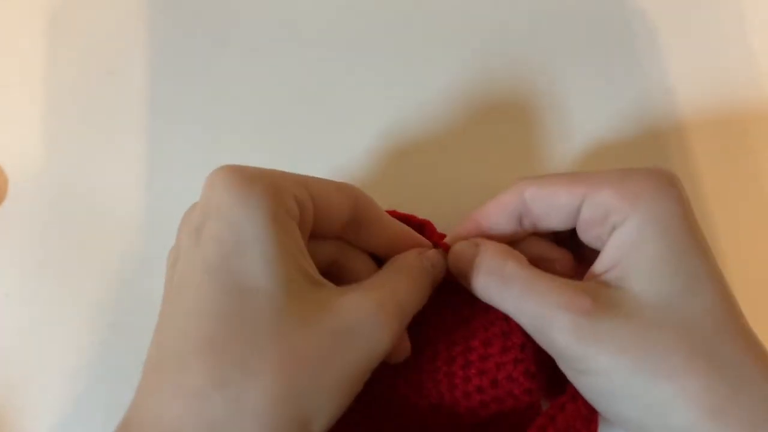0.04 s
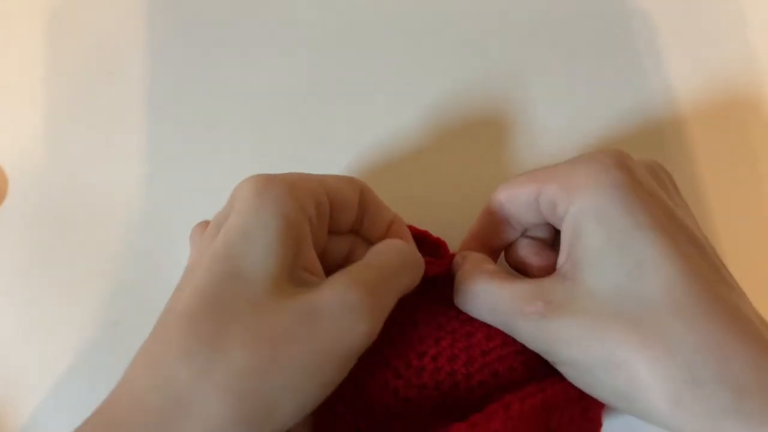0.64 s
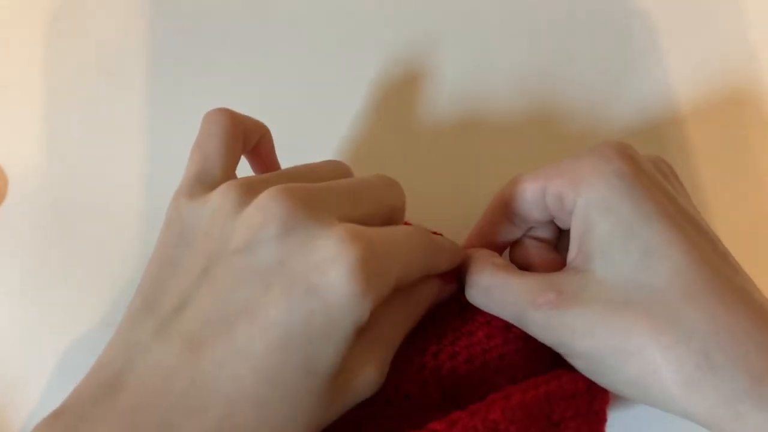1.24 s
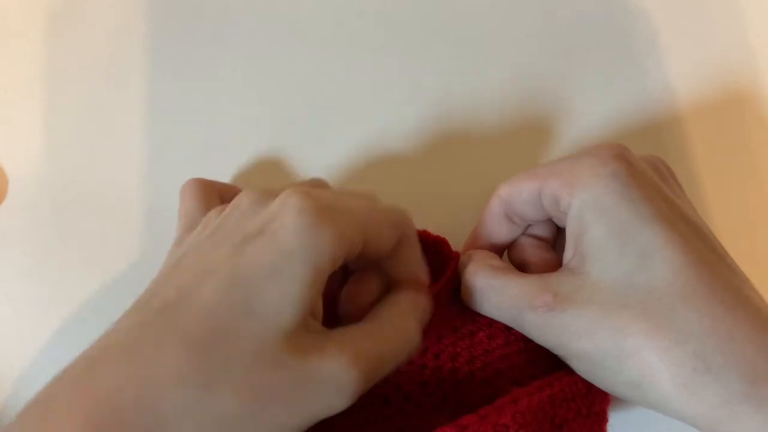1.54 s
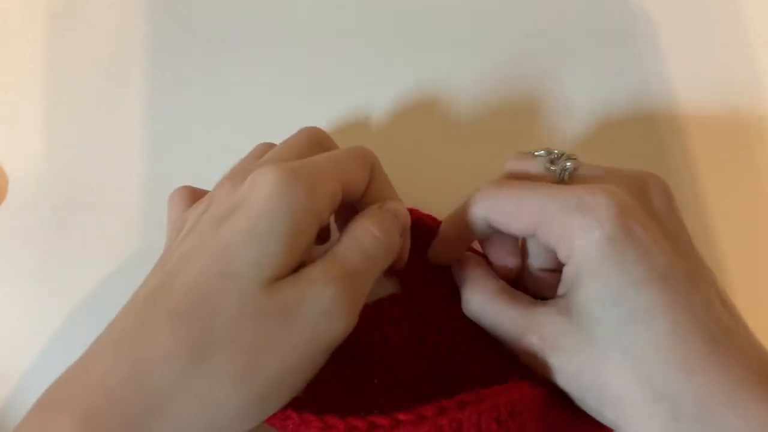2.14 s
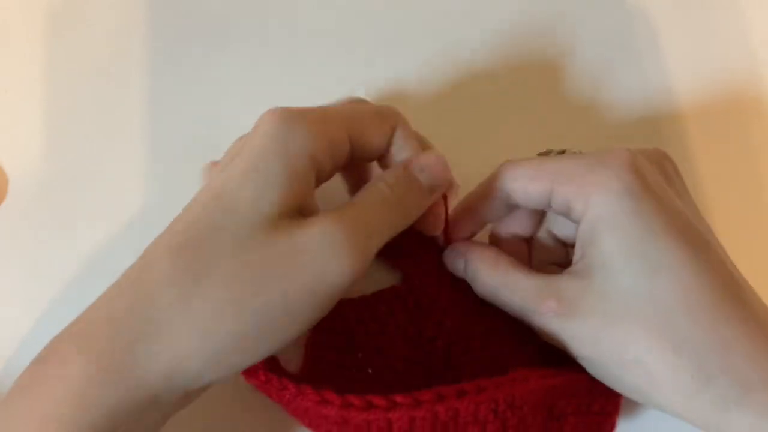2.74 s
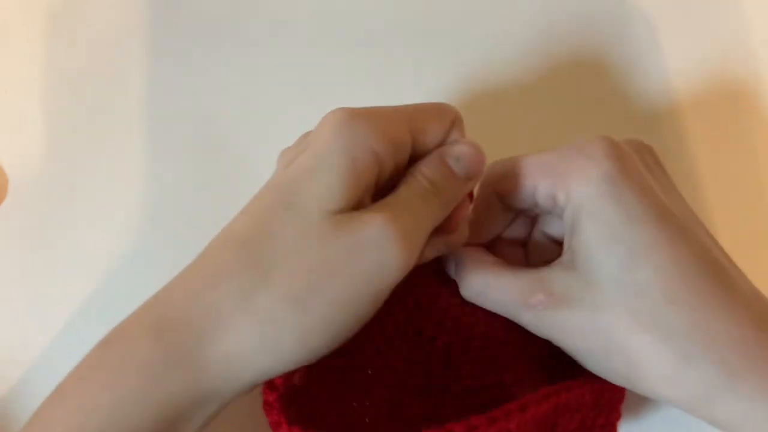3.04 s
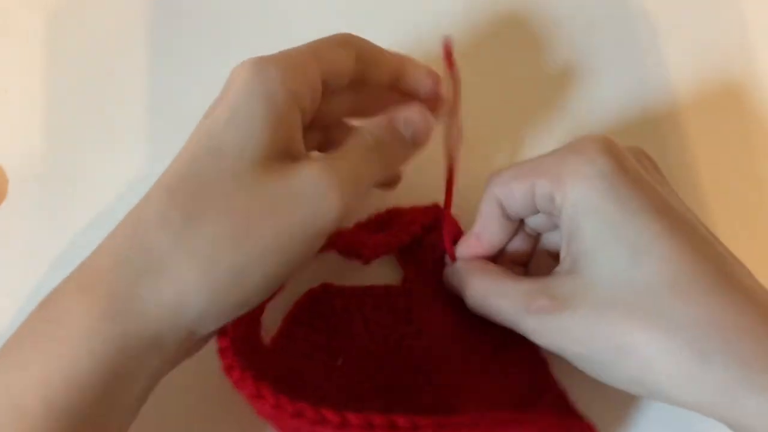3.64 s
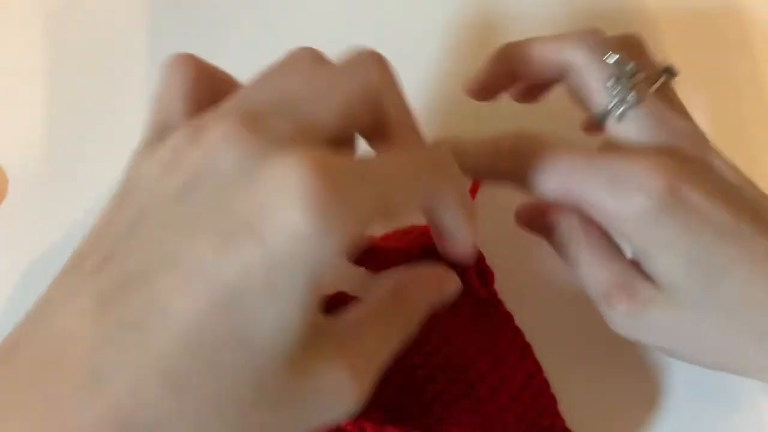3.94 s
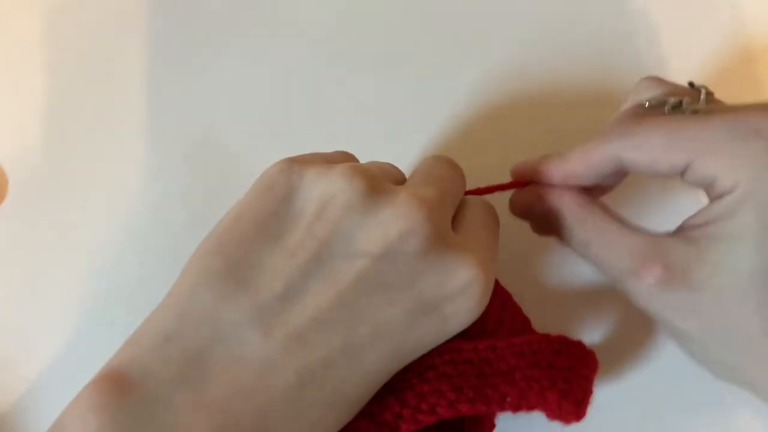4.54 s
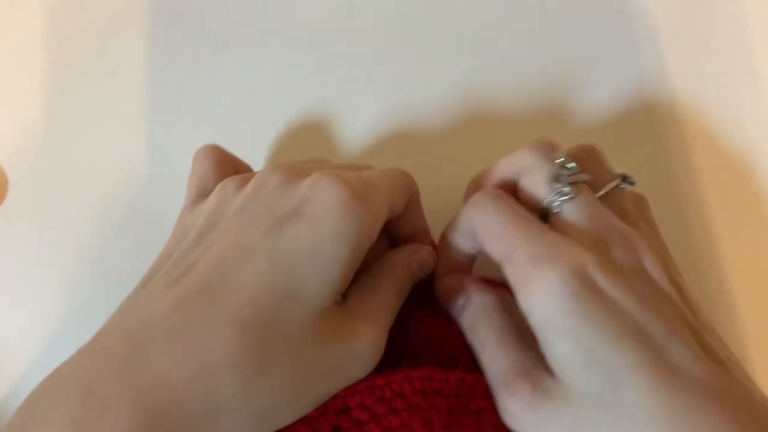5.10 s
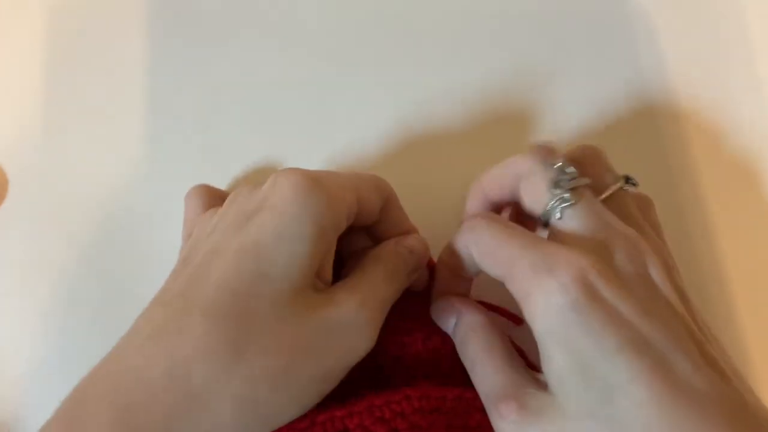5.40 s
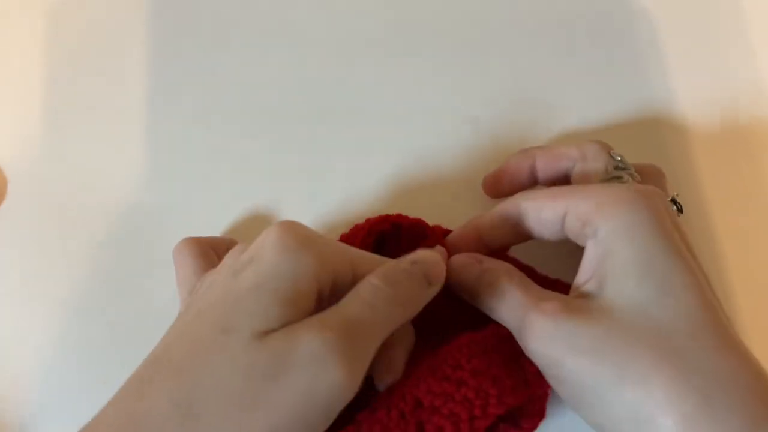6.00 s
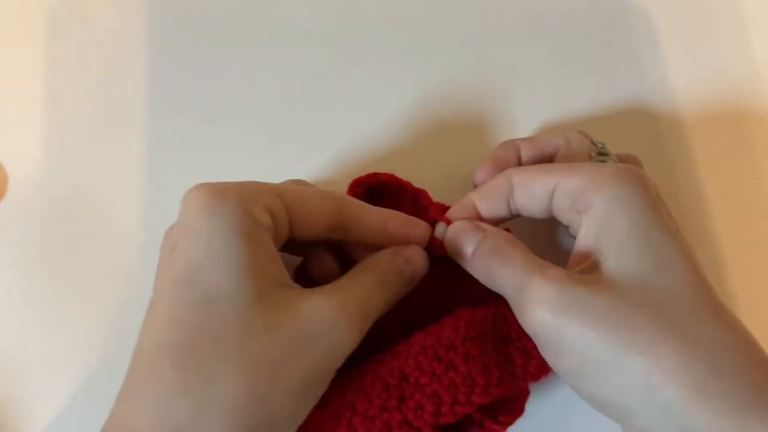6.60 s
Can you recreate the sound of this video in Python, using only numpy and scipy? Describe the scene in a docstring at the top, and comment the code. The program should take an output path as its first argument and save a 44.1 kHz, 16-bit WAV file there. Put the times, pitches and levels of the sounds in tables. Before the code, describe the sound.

Close, quiet rustling and hissing of yarn being tied, with fingers knocking on a table, light ticks and a few faint distant clicks.

```python
"""Tying off crochet yarn

Two hands finish a crocheted piece on a table, close by in a quiet room. Wool slides over skin and
stitches in soft rubs and three long pulls, a hiss of fibres slipping free. Fingers brush, bump and
knock on the table top, and nails tick. Further off a small hard thing, perhaps a plastic button,
clicks now and then over a low room rumble."""
import sys
import numpy as np
from scipy import signal
from scipy.fft import rfft, irfft, next_fast_len
from scipy.io import wavfile

SR = 44100
rng = np.random.default_rng(int(sys.argv[2]) if len(sys.argv) > 2 else 0)


def master_out(mix):
    """Clip the mix to full scale and print it as 16-bit PCM to the path in sys.argv[1]."""
    frames = np.transpose(np.atleast_2d(mix))
    ceiling = np.clip(frames, -1, 1)
    pcm = np.round(ceiling * 32767).astype(np.int16)
    wavfile.write(sys.argv[1], SR, pcm)


N = 302526
T = np.arange(N) / SR
SIZE = next_fast_len(N, True)
FREQ = np.maximum(np.arange(SIZE // 2 + 1) * SR / SIZE, 1)

# colour of the room tone: freq_hz, gain_db
ROOM_COLOUR = [(22, -39), (32, -31), (42, -9.5), (55, -14), (72, -0.5), (88, -1), (120, -9), (160, -29),
               (300, -39), (600, -54), (1600, -54.5), (3000, -69), (5500, -67.5), (16000, -69)]
# distant clicks: snap_s, level_db
CLICKS = [(-.012, -48.5), (0.2765, -47.5), (0.5405, -49.5), (0.599, -51.5), (0.8366, -47), (0.9362, -51),
          (1.958, -48)]
# resonances of the small hard thing: pitch_hz, width_hz, gain_db
CLICK_MODES = [(283, 330, 13.5), (1040, 350, 6), (1695, 310, 7), (2290, 83, 6.5), (3580, 130, 0),
               (4510, 540, 5), (5950, 1340, 2), (7720, 65, 8.5), (8730, 230, 6.5), (9500, 86, -6),
               (10250, 340, 4.5), (10840, 310, 7), (11000, 68, 9), (14200, 190, -10), (15350, 150, 1)]
# resonances of the table top: pitch_hz, t60_s, gain_db
TABLE_MODES = [(155, 0.062, -11), (235, 0.082, -1), (292.6, 0.041, 1.5), (358, 0.097, -1), (448, 0.05, -4),
               (540, 0.033, 0.5), (721, 0.022, -5), (1215, 0.018, 1.5), (1583, 0.03, -10)]
# the heel of a hand dragging: middle_s, level_db, half_length_s
DRAGS = [(.005, -65, 0.014), (1.58, -66.5, 0.036), (1.705, -62, 0.0069), (1.80, -62, 0.041),
         (4.135, -58.5, 0.033), (6.005, -59, 0.024), (6.355, -56.5, 0.022), (6.455, -52.5, 0.034)]
# fingers scuffing the table: middle_s, level_db, half_length_s
SCUFFS = [(3.199, -54.5, 0.0066), (6.019, -58, 0.0059), (6.036, -57, 0.017), (6.057, -54.5, 0.014),
          (6.383, -48, 0.018), (6.4025, -45.5, 0.0045)]
# colour of a scuff: freq_hz, gain_db
SCUFF_COLOUR = [(150, 12), (400, -3.5), (750, -5.5), (1100, -6.5), (1450, 8.5), (1850, -8), (2700, -23.5),
                (4300, -17), (9000, -29.5), (15000, -35)]
# hands bumping the table: start_s, level_db
BUMPS = [(0.139, -41), (.968, -41), (1.193, -40), (0.297, -40.5), (3.135, -37.5), (3.202, -26),
         (3.54, -41.5), (4.098, -27.5), (5.575, -44.5), (5.829, -42), (6.0044, -34.5), (6.354, -35.5),
         (6.4217, -32.5), (6.482, -34), (6.7778, -32.5)]
# finger knocks: start_s, level_db, contact_ms
KNOCKS = [(3.181, -49.5, 1.3), (3.199, -38, 7.5), (4.0813, -34.5, 1.5), (4.094, -38.5, 5.5),
          (6.062, -47.5, 0.68), (6.38, -37.5, 0.91), (6.394, -35, 0.7), (6.4000, -35, 0.14),
          (6.4064, -40, 0.77), (6.768, -54.5, 6.2)]
# ticks of nails and finger rings: start_s, level_db, pitch_hz, tail_db (relative to the crack)
TICKS = [(1.386, -61, 7800, -9), (1.6901, -46.5, 4530, -10), (1.7371, -50.5, 4630, 4),
         (1.8621, -53, 5750, -11), (1.987, -47.5, 1290, -10), (3.1870, -50, 4170, 8),
         (4.0835, -52, 5870, -6), (5.31, -31.5, 5500, -16), (6.3423, -56, 1090, -15),
         (6.4007, -44, 1240, -20), (6.6980, -53, 3430, -8)]
# colour of wool sliding over skin: freq_hz, gain_db
WOOL_COLOUR = [(120, 3), (300, 0.5), (440, -8), (560, -8), (720, -9.5), (1000, -6.5), (1500, 3.5),
               (2050, -3), (2850, -15.5), (4200, -6), (6000, -6.5), (7400, -11), (10800, -13.5),
               (15500, -26.5)]
# short rubs on the wool: peak_s, length_s, hiss_db, body_db, fibre_db (last two relative to the hiss)
RUBS = [(0.047, 0.14, -74, 6, -20), (0.25, 0.13, -82, 13.5, -20), (0.335, 0.17, -71.5, 1.5, -7),
        (0.465, 0.066, -73, 3.5, -18), (0.673, 0.25, -67.5, -3.5, -6.5), (1.048, 0.21, -76.5, 2.5, -21),
        (1.332, 0.034, -87.5, 12, -10), (1.42, 0.11, -77.5, -4, -10), (1.553, .11, -70.5, 1.5, -8),
        (1.628, 0.021, -67, -3, -15), (1.773, 0.25, -70.5, 0.5, -11), (2.12, .2, -88, -4, -20),
        (3.196, 0.11, -70, 5, -8.5), (3.357, 0.058, -89, 15.5, -5), (4.044, 0.051, -67.5, 6, -9.5),
        (4.122, 0.066, -63.5, 3.5, -4), (4.227, 0.17, -81.5, 4.5, -18), (4.328, .12, -68.5, 3, -12),
        (4.42, 0.034, -71.5, 4.5, -11.5), (4.548, 0.17, -69, 3.5, -11.5), (4.687, 0.066, -69.5, 5, -8),
        (4.785, 0.11, -69.5, 3.5, -10.5), (4.943, 0.2, -67, 1, -6.5), (5.101, 0.14, -67, 1, -12.5),
        (5.296, 0.15, -66.5, 4, -9.5), (6.062, 0.17, -70, 3.5, -12), (6.174, 0.085, -70.5, 0, -14),
        (6.281, 0.11, -70.5, 2, -5.5), (6.393, 0.072, -69, 6.5, -5.5), (6.568, 0.18, -66.5, -1.5, -12.5),
        (6.753, 0.27, -78, 5.5, -19)]
# long pulls through the knot, a curve each: time_s, hiss_db, body_db, fibre_db (relative as in RUBS)
PULLS = [
    [(2.44, -88, -6, -9), (2.506, -79, -2.5, -19), (2.614, -70, 4.5, -6.5), (2.674, -68.5, 4, -6),
     (2.744, -65, -4.5, -6), (2.942, -76, 0.5, -9.5), (3.068, -71.5, -5, -11), (3.11, -81.5, 4.5, -16)],
    [(3.48, -89, -8, -2), (3.494, -83, -13, -12), (3.518, -69, -0.5, -10), (3.634, -61, -2, -1),
     (3.798, -67.5, 2.5, -6), (3.886, -69.5, -2.5, -10), (3.94, -86, 6, -13), (3.95, -97, -3, -13)],
    [(5.34, -68, 1.5, -0.5), (5.418, -66, 0, -8), (5.51, -65.5, -1, -4.5), (5.564, -62.5, 2.5, -4),
     (5.848, -62.5, -1, -6.5), (5.954, -73.5, 5.5, -10), (5.98, -79, -5, -15)],
]
# phase by which left leads right: freq_hz, tan_half_phase
STEREO_PHASE = [(250, 0), (450, .35), (700, 1.0), (1380, .55), (1950, .15), (2250, -1.0), (2650, -2.0),
                (3050, 1.9), (3500, 1.0), (4300, .05), (8000, 0)]
# scattered sound that widens the image: freq_hz, side_gain_db
STEREO_WIDTH = [(60, -30), (110, -26), (200, -14), (380, -10), (700, -4), (1300, -9), (2600, -2),
                (4400, -11), (8000, -15), (15000, -14)]
# lean of the image: freq_hz, left_minus_right_db
STEREO_LEAN = [(80, -.2), (180, -2), (350, -5), (700, -1), (1300, 0), (2400, -2.5), (4500, -1.8),
               (10000, 0)]


def undb(db):
    """Decibels to gain."""
    return 10 ** (np.asarray(db) / 20)


def rms(x):
    """Root mean square."""
    return np.sqrt(np.mean(x ** 2))


def eq_curve(points):
    """Gain at every frequency from (freq_hz, gain_db) points."""
    hz, db = np.transpose(points)
    return undb(np.interp(np.log(FREQ), np.log(hz), db))


def shape(x, gain):
    """Filter by a gain per frequency."""
    return irfft(rfft(x, SIZE) * gain, SIZE)[..., :N]


def noise(colour):
    """Mid and side noise in one colour, with an rms of 1."""
    x = shape(rng.standard_normal((2, N)), colour)
    return x / rms(x)


def resonance(hz, width_hz):
    """Complex response of one damped resonance."""
    return 1 / (1 + 1j * (FREQ ** 2 - hz ** 2) / (FREQ * width_hz))


def decay(start_s, t60):
    """Envelope that jumps to 1 and dies away exponentially."""
    return (T >= start_s) * undb(-60 * np.clip((T - start_s) / t60, 0, 4))


def wander(rate_hz):
    """Smooth random drift with a spread of about 1."""
    count = int(3 * rate_hz * T[-1]) + 3
    points = np.convolve(rng.standard_normal(4096), np.hanning(5), "same")[:count]
    return np.interp(T, np.linspace(0, T[-1], len(points)), points / rms(points))


def room_tone(rumble_db=-52.5, drift_db=0.47, hiss_db=-49.5, crossover_hz=170):
    """The bed: a slowly swelling low rumble under a faint steady hiss."""
    air = noise(eq_curve(ROOM_COLOUR))
    rumble = shape(air, 1 / (1 + (FREQ / crossover_hz) ** 8))
    return rumble * undb(rumble_db + drift_db * wander(0.73)) + (air - rumble) * undb(hiss_db)


def distant_clicks(snap_db=-2, tail_db=-10, tail_t60=0.38, treble_t60=0.3, crossover_hz=4500):
    """A soft first contact, then a bright snap; the room rings after both, more briefly in the treble."""
    lead_s, lead_db = .0132, -11  # the first contact
    rise_s, snap_t60 = .002, .045
    mode_power = sum(abs(undb(db) * resonance(hz, width) ** 1.68) ** 2 for hz, width, db in CLICK_MODES)
    sheen = undb(-8) * resonance(10400, width_hz=12000)
    colour = np.sqrt(mode_power + abs(sheen) ** 2)
    highpass = FREQ ** 2 / (FREQ ** 2 + crossover_hz ** 2)
    envelope = sum(undb(db) * ((T < s) * np.exp(-abs(T - s) / rise_s) + decay(s, snap_t60))
                   for s, db in CLICKS)

    def tail(t60):
        """Envelope of the room's answer to all clicks."""
        return sum(undb(db) * np.hypot(undb(lead_db) * decay(s - lead_s, t60),
                                       undb(tail_db) * decay(s, t60)) for s, db in CLICKS)

    ring = noise(colour)
    treble = shape(ring, 1 - 1 / (1 + (FREQ / crossover_hz) ** 4))
    snaps = undb(snap_db) * envelope * noise(colour * highpass)
    return snaps + tail(treble_t60) * treble + tail(tail_t60) * (ring - treble)


def skin_friction(touches, colour, stutter_db, stutter_hz):
    """Skin stutters across the table top, one brief swell of noise per touch."""
    pressure = sum(undb(db) * np.exp(-.5 * ((T - s) / half_s) ** 2) for s, db, half_s in touches)
    return pressure * undb(stutter_db * wander(stutter_hz)) * noise(colour)


def hand_drags(lowpass_hz=125):
    """The heel of a hand drags dully and stirs the table's low modes."""
    table = sum(undb(db) * resonance(hz, np.log(1000) / np.pi / t60) for hz, t60, db in TABLE_MODES)
    return skin_friction(DRAGS, table / (1 + (FREQ / lowpass_hz) ** 2), stutter_db=-0.5, stutter_hz=51)


def finger_scuffs():
    """Fingers brush the table with a brighter, faster stutter."""
    return skin_friction(SCUFFS, eq_curve(SCUFF_COLOUR), stutter_db=1.0, stutter_hz=200)


def hand_bumps(pitch_hz=83.6, swell_s=0.017, firmness=1.86):
    """The weight of a hand swells the table's lowest mode, which dies within a few cycles."""
    mid = np.zeros(N)
    for start_s, db in BUMPS:
        age = np.maximum(T - start_s, 0)
        progress = np.minimum(age / swell_s, 20)
        swell = (progress * np.exp(1 - progress)) ** firmness
        mid += undb(db) * swell * np.sin(2 * np.pi * pitch_hz * age)
    return np.array([mid, np.zeros(N)])


def finger_knocks(spot_spread_db=1, side_db=-3):
    """Fingers strike the table's modes; a longer contact is duller, and each spot has its own balance."""
    out = np.zeros((2, N + SR))
    t = T[:SR // 5]
    modes = np.array([undb(db - 60 * t / t60) * np.sin(2 * np.pi * hz * t)
                      for hz, t60, db in TABLE_MODES])
    modes[1::2] *= -1  # heard away from the finger, neighbouring modes arrive in opposite sign
    for start_s, db, contact_ms in KNOCKS:
        progress = t * 1000 / contact_ms
        push = progress * np.exp(-4 * progress)
        weights = undb(spot_spread_db * rng.standard_normal((2, len(modes))))
        weights[1] *= undb(side_db) * rng.choice([-1, 1], len(modes))
        knock = signal.fftconvolve(weights @ modes, push[None], axes=1)[:, :len(t)]
        start = int(start_s * SR)
        out[:, start:start + len(t)] += undb(db) * knock / abs(knock[0]).max()
    return out[:, :N]


def nail_ticks(crack_t60=.0035, tail_t60=.045, width_share=0.99, hollow_db=-7):
    """A tiny crack in a broad resonance, with a scratchy tail; the air in the cupped hands rings along."""
    hollow = undb(hollow_db) * resonance(1420, width_hz=1030) ** 2
    out = 0
    for start_s, db, hz, tail_db in TICKS:
        envelope = decay(start_s, crack_t60) + undb(tail_db) * decay(start_s, tail_t60)
        burst = rng.standard_normal((2, N)) * envelope
        tick = shape(burst, resonance(hz, width_share * hz) ** 2 + hollow)
        out += undb(db) * tick / abs(tick[0]).max()
    return out


def rubs_and_pulls(attack_share=0.56, release_share=0.55, flatness=2.4, pull_fade_s=0.022):
    """Envelopes of body, hiss and fibres: a rub is one swell of sliding speed, a pull follows its curve."""
    speed_exponents = np.array([[0.93], [1], [1.75]])  # faster sliding favours the fine fibres
    power = np.zeros((3, N))
    for peak_s, length_s, hiss_db, body_db, fibre_db in RUBS:
        from_peak = np.where(T < peak_s, (peak_s - T) / attack_share, (T - peak_s) / release_share)
        from_peak /= length_s
        near = from_peak < 3
        speed = np.exp(-from_peak[near] ** flatness)
        gains = undb([hiss_db + body_db, hiss_db, hiss_db + fibre_db])
        power[:, near] += (gains[:, None] * speed ** speed_exponents) ** 2
    for pull in PULLS:
        times, *curves = np.transpose(pull)
        hiss_db, body_db, fibre_db = (np.interp(T, times, curve) for curve in curves)
        outside_s = abs(T - np.clip(T, times[0], times[-1]))
        gate = np.exp(-np.minimum(outside_s / pull_fade_s, 20))
        power += (gate * undb([hiss_db + body_db, hiss_db, hiss_db + fibre_db])) ** 2
    return np.sqrt(power)


def sliding_wool(snaps_per_s=900, snap_db=-4, smooth_db=-3, grip_db=1.7, catch_db=1.3, catch_hz=30):
    """Fibres slip and snap free; the yarn catches on the stitches and its colour shifts with the grip."""
    snaps = (rng.random(N) < snaps_per_s / SR) * rng.choice([-1, 1], (2, N))
    friction = undb(snap_db) * snaps / rms(snaps) + undb(smooth_db) * rng.standard_normal((2, N))
    spectrum = rfft(friction, SIZE) * eq_curve(WOOL_COLOUR)
    # three layers, low to high: the hollow body of the hands, the hiss, the fine fibres
    layers = np.zeros((3, 2, N))
    crossovers_hz = [2660, 8420]
    # each contact patch has its own band, which swells and fades by itself
    centres_hz = np.geomspace(500, 15000, 18)
    for hz, band_gains in zip(centres_hz, np.eye(len(centres_hz))):
        band = irfft(spectrum * np.interp(FREQ, centres_hz, band_gains), SIZE)[:, :N]
        layers[np.searchsorted(crossovers_hz, hz)] += band * undb(grip_db * wander(rate_hz=13))
    sliding = sum(envelope * layer / rms(layer) for envelope, layer in zip(rubs_and_pulls(), layers))
    return sliding * undb(catch_db * wander(catch_hz))


def scene():
    """Mix all sources as mid and side, then spread them to left and right."""
    background = room_tone() + distant_clicks()
    table = hand_drags() + finger_scuffs() + hand_bumps() + finger_knocks()
    mid, scatter = background + table + nail_ticks() + sliding_wool()
    out_of_step = shape(mid, 1j * np.interp(FREQ, *np.transpose(STEREO_PHASE)))
    side = out_of_step + shape(scatter, eq_curve(STEREO_WIDTH))
    return np.array([mid + side, mid - side])


def record(dry, low_cut_hz=54.3, high_cut_hz=15800):
    """The phone hears a little more on the right and cuts the deepest bass and the very top."""
    lean = np.sqrt(eq_curve(STEREO_LEAN))
    low_cut = 1 / np.sqrt(1 + (low_cut_hz / FREQ) ** 8)
    high_cut = signal.ellip(10, .2, 70, high_cut_hz, fs=SR, output="sos")
    heard = shape(dry, low_cut * np.array([lean, 1 / lean]))
    return signal.sosfilt(high_cut, heard)


dry = scene()
out = record(dry)
master_out(out)
```